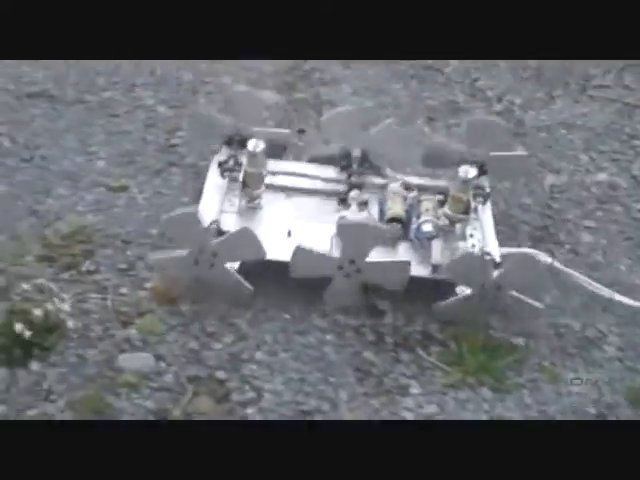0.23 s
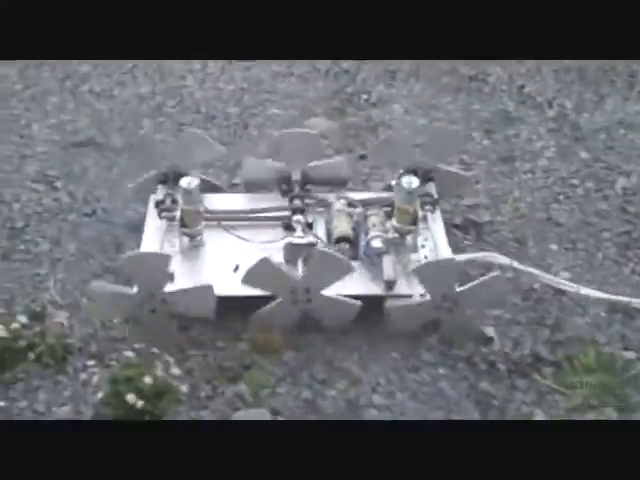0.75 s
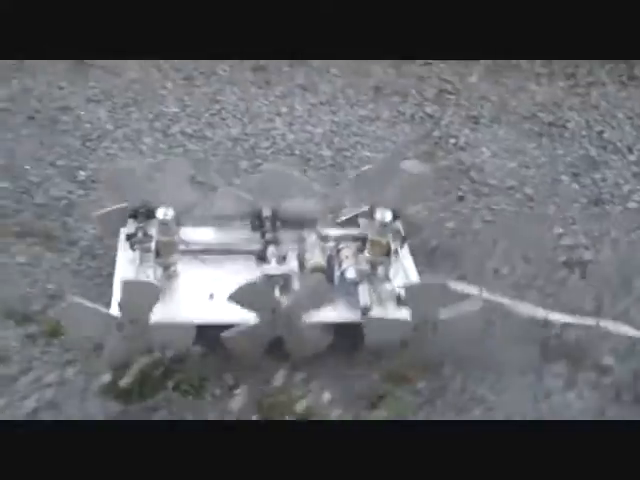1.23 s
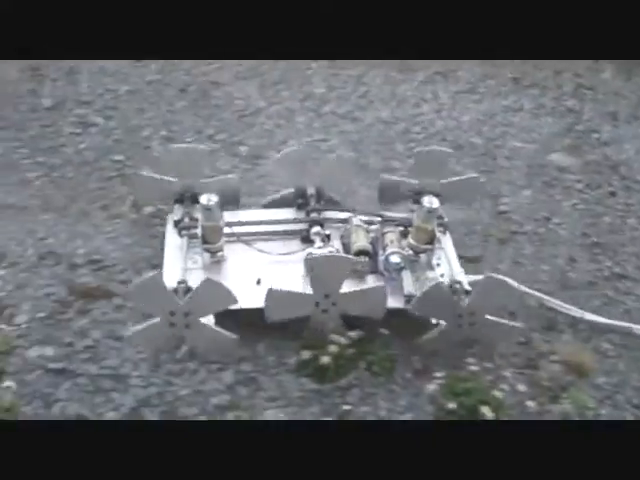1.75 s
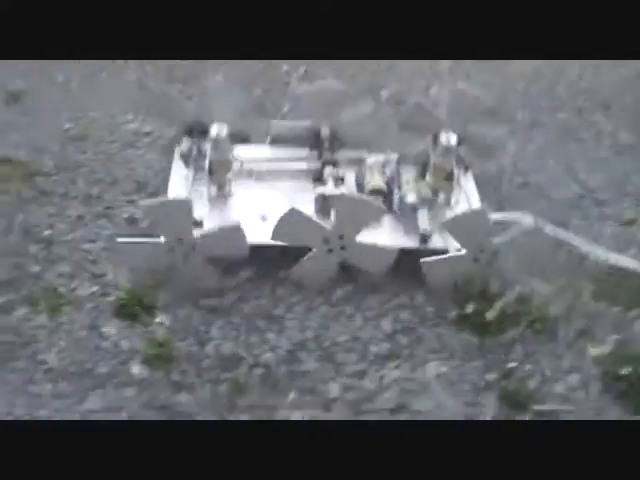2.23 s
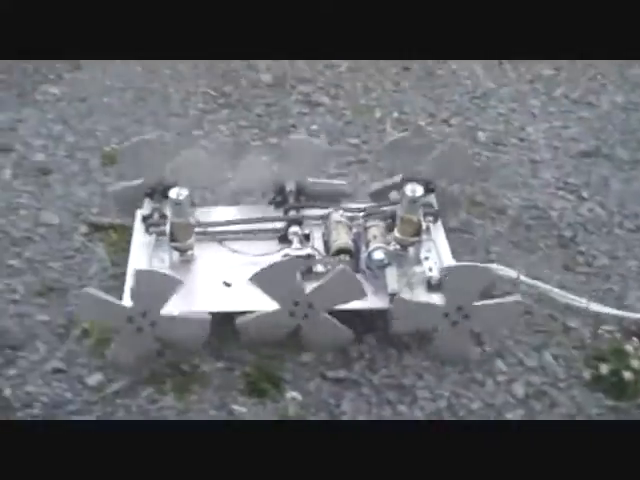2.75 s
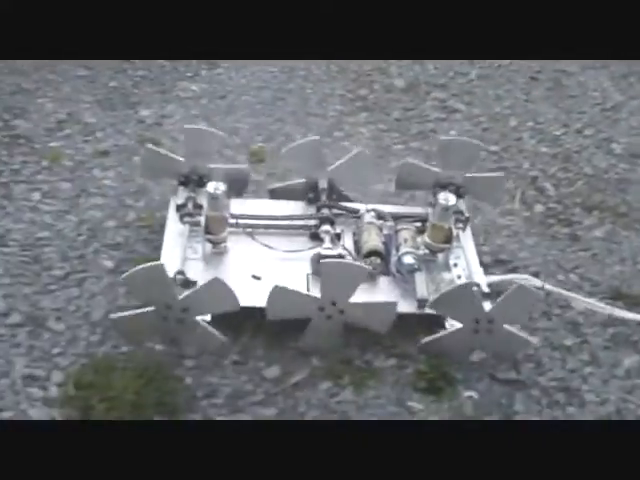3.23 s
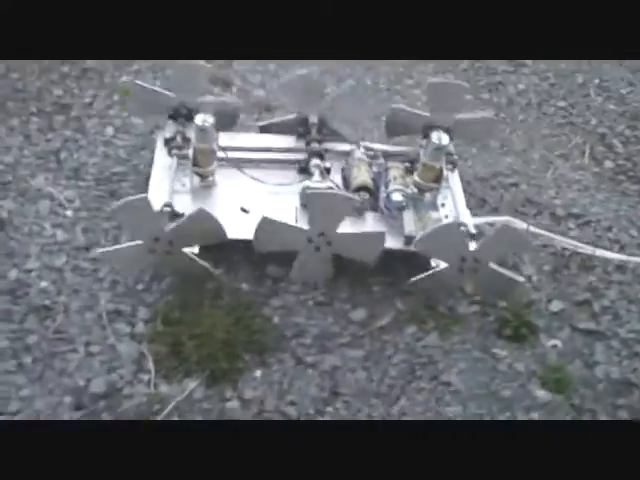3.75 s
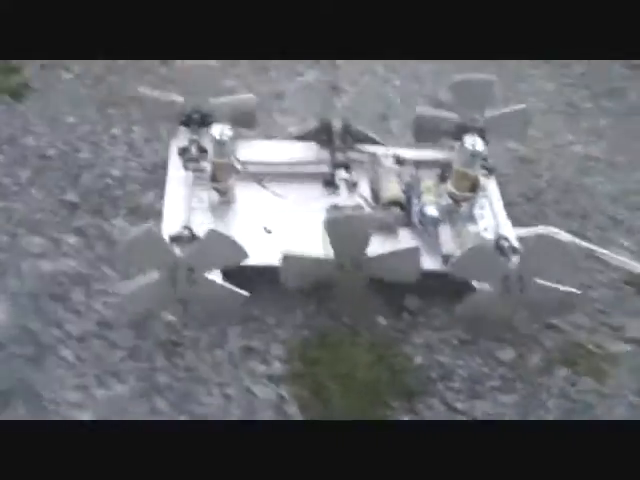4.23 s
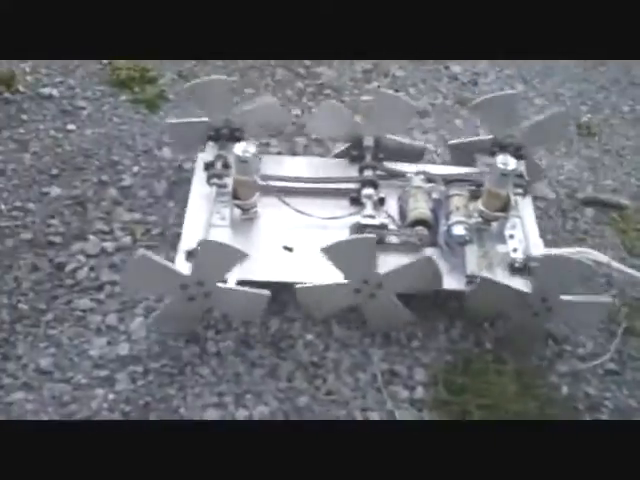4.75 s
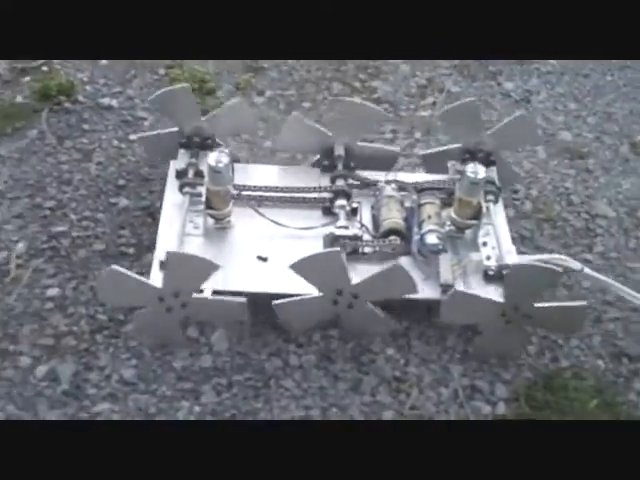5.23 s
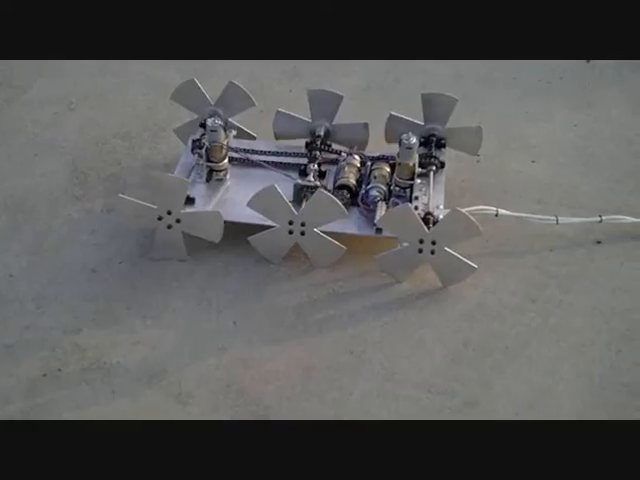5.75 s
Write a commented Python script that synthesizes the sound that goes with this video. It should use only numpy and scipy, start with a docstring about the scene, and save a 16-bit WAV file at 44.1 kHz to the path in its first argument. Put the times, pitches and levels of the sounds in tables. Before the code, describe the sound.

Fast, irregular metallic slapping and rattling on gritty stones, heard close and dry outdoors, with grinding crunches and barely audible motor hum, stopping suddenly.

```python
"""Paddle slaps on loose gravel lead: a small robot on metal paddle wheels clatters along, heard close by.
Each slap is a burst of shaped noise with a low knock, a high tick and a clean decaying rap.
Stones grind and click as the wheels plough in: noise and short damped tones, swelling at each dig.
Slaps and grinding excite the resonances of paddles and chassis; a faint wavering paddle ring follows the
crunch, and motor tones lie beneath. The sound stops abruptly."""
import sys
import numpy as np
from scipy.fft import rfft, irfft, next_fast_len
from scipy.io import wavfile
from scipy.ndimage import uniform_filter1d, map_coordinates

SR = 44100
rng = np.random.default_rng(int(sys.argv[2]) if len(sys.argv) > 2 else 0)


def unload_audio(sound):
    """Save the sound as a 16-bit wav file, at the path given as the first command line argument."""
    columns = np.transpose(np.atleast_2d(sound))
    # keep every value between -1 and 1, then stretch to whole-number steps
    steps = np.round(np.clip(columns, -1, 1) * 32767)
    wavfile.write(sys.argv[1], SR, steps.astype(np.int16))


N = 264746

# Motor tones: (mean frequency [Hz], frequency waver [Hz])
MOTOR_TONES = [(81, 1), (161, 1), (233, 3.5)]
# Mean motor tone levels under load: (time [s], low tone [dB], middle tone [dB], high tone [dB])
MOTOR_LOAD = [(0.05, -76, -63, -62), (0.46, -100, -88, -65.5), (1.28, -83, -67, -65),
              (3.62, -85, -71.5, -59), (4.17, -79, -85, -70), (4.45, -75, -64.5, -59.5),
              (4.89, -75, -75, -65.5), (5.07, -73, -73.5, -51.5), (5.55, -68, -69, -66.5)]
# Mean level of the paddles' faint wavering ring: (time [s], level over the crunch [dB])
PADDLE_HUM = [(0, -18), (.7, -12.5), (1.3, -15.5), (1.8, -24), (2.3, -21), (2.8, -21), (2.97, -3),
              (3.12, -19), (3.5, -9), (3.9, -14), (4.12, -12.5), (4.5, -12), (4.75, -22), (5.0, -10),
              (5.3, -14), (5.6, -16.5)]
# Bed of shifting gravel that never stops: (time [s], crunch level [dB])
GRAVEL_BED = [(0.0, -27.5), (0.32, -28), (0.53, -37.5), (0.92, -34), (1.56, -33), (1.99, -35.5),
              (2.21, -28.5), (3.4, -33), (3.79, -43), (4.64, -34), (5.02, -30.5), (5.45, -37.5)]
# Wheels dig in and plough through the stones: (time [s], crunch level at the start [dB], length [s],
# treble over crunch [dB], paddle ring over crunch [dB])
WHEEL_PLOUGHS = [(0, -41.5, 0.043, -11, 3.5), (0.136, -30.5, 0.31, -1.5, -13),
                 (0.49, -31, 0.15, -2.5, -13.5), (0.69, -20.5, 0.064, -7.5, 1.5),
                 (0.768, -29.5, 0.16, -5.5, 6.5), (0.932, -37.5, 0.087, -0.5, 11.5),
                 (1.106, -32, 0.25, 1, 4), (1.387, -31.5, 0.036, -17, -2.5), (1.494, -38, 0.18, -2, -4),
                 (1.631, -25, 0.043, -5, -4), (1.711, -26.5, 0.086, -8, -2), (2.001, -30, 0.11, 0.5, 3.5),
                 (2.1, -32, 0.1, -5, -7.5), (2.262, -44, 0.087, 13.5, 10), (2.385, -28, 0.14, -0.5, -4.5),
                 (2.563, -55, 0.75, 4.5, 8.5), (2.845, -31, 0.18, -0.5, 6), (3.07, -57.5, 0.074, 1.5, 10),
                 (3.216, -27.5, 0.13, 3, -0.5), (3.394, -39.5, 0.35, -1, 8.5), (3.715, -33, 0.22, -4.5, -1),
                 (4.015, -34, 0.19, -6, 8), (4.225, -38.5, 0.13, -11.5, -8.5), (4.39, -30, 0.18, -2.5, 4.5),
                 (4.597, -40, 0.048, 0, 1), (4.731, -39.5, 0.047, -16, 12), (4.838, -49.5, 0.41, 8.5, 11),
                 (5.087, -32, .13, -8.5, 10.5), (5.322, -44.5, 0.48, 3, 11.5), (5.503, -32, 0.051, -7.5, 1)]
# Broad colour of stone on stone and metal: (frequency [Hz], gain [dB])
STONE_COLOUR = [(30, -67.5), (150, -22), (300, -9.5), (500, -3.5), (1000, 1.5), (2000, 1.5), (4000, 1.5),
                (7000, 1.5), (10000, 0), (13000, -6), (15200, -59.5), (15400, -56), (15800, -62)]
# Modes of paddles and chassis, close groups as the wheels differ a little:
# (frequency [Hz], width [Hz], mean gain [dB])
METAL_MODES = [(491, 64, -6.5), (873, 33, -9.5), (1355, 17, -8), (1590, 34, -14.5), (2752, 20, 6.5),
               (2807, 28, 9), (2930, 10, -12), (2913, 38, -13), (3030, 47, -13.5), (3395, 42, 1.5),
               (4830, 50, -4.5), (5075, 18, -12.5), (4860, 11, -19.5), (5660, 24, -3), (6085, 74, -11),
               (7080, 29, -4.5), (6850, 35, -7), (8840, 240, -13), (9900, 58, -24.5), (10300, 65, -9),
               (11450, 150, -28), (12500, 240, -23.5)]
# Paddle slaps; each part's level is relative to the slap and is further offset by the constants below:
# (first touch [s], slap level [dB],
# fall [ms per 6 dB, held within 0.5 to 25; lower values mean the shortest slap],
# knock frequency [Hz], knock level [dB], tick frequency [Hz], tick level [dB],
# treble level [dB], paddle ring level [dB])
PADDLE_SLAPS = [(0.05, -5.5, 5.5, 1396, -6.5, 3500, -26.5, -12, -17),
                (0.073, -5, -0.5, 1285, -8, 3070, -15, -12, -18),
                (0.112, -25, -3, 1270, -3, 3360, -18, -19, -19.5),
                (0.155, -2.5, 6.5, 1290, -15.5, 3780, -17, -28.5, -17),
                (0.2, -3, 8.5, 1270, -8, 3100, -21, -31.5, -24),
                (0.213, -10, -2, 1210, -14, 5960, -6, -8, -18),
                (0.268, -8, 2, 1350, -5, 3280, -25, -19.5, -11.5),
                (0.314, 1, 1.5, 1340, -10, 3470, -35.5, -14, -24.5),
                (0.339, -5.5, 5.5, 1880, -4, 3050, -21, -17, -19.5),
                (0.36, -9, 10, 2490, -15, 3770, -19, -19.5, -20),
                (0.407, -9, 11, 1840, -15, 3480, -24, -12, -18),
                (0.482, -18.5, 5, 1040, 7, 3480, -18, -30, -25),
                (0.5, -7.5, 5.5, 1040, -16, 3360, -11, -25, -24),
                (0.518, -18, 18, 1420, -4.5, 3430, -26, -22, -15.5),
                (0.536, -2.5, 2, 2110, -16.5, 3530, -12, -15.5, -25),
                (0.583, -16.5, 7, 2280, -6, 3310, -16, -16, -19.5),
                (0.61, -16, 4.5, 2050, -14.5, 4050, -12.5, -19, -19),
                (0.677, -15, 9, 1460, -12.5, 3440, -20, -18, -9.5),
                (0.693, -3.5, 7.5, 944, -7.5, 3340, -19, -18.5, -24),
                (0.713, -6.5, 6.5, 1430, -15.5, 3780, -12, -12, -16.5),
                (0.731, -1.5, 8, 1760, -9.5, 6000, -27, -17, -21),
                (0.789, -16.5, 6.5, 1617, -10, 3390, -20, -20, -20),
                (0.842, -3, 7.5, 1310, -10, 4900, -26.5, -14.5, -17.5),
                (0.85, -1, 11.5, 2030, -10.5, 3180, -25, -15, -20.5),
                (0.888, -13.5, 4.5, 1610, -10, 3380, -18, -15.5, -16.5),
                (0.939, -16.5, 6.5, 1062, 3.5, 3460, -22, -14, -22.5),
                (0.954, -11, 10.5, 828, 0, 3050, -15, -11.5, -14),
                (0.989, -7, 5.5, 2410, -15.5, 7030, -15, -5.5, -17.5),
                (1.087, -16, 8.5, 1615, -4.5, 6100, -22.5, -18, -12.5),
                (1.106, -6, 10.5, 1246, -10, 4400, -23, -20.5, -12),
                (1.129, -2, 7, 1400, -8, 3400, -36.5, -17.5, -17.5),
                (1.185, -10, 7, 2130, -3, 3320, -12, -10, -19),
                (1.202, -12, 16.5, 1580, -13, 3350, -13, -22, -18),
                (1.233, -10, 20, 2470, -6, 4900, -16.5, -18, -27.5),
                (1.242, -13.5, 8, 1970, -7.5, 3190, -20, -13.5, -19.5),
                (1.273, -3, 2, 870, -36, 3120, -19, -16, -21.5),
                (1.319, -15.5, -1.5, 1600, -6.5, 3420, -18, -20, -20.5),
                (1.385, -13.5, 9, 1210, -5, 7170, -9, -5.5, -19),
                (1.444, -13.5, 15, 990, -10, 3430, -23, -16, -26),
                (1.476, -15, 3, 950, 2.5, 3140, -19.5, -19, -22.5),
                (1.508, -12.5, 10.5, 1300, -4.5, 3170, -20.5, -16, -20.5),
                (1.522, -10.5, -1, 1420, -8, 4810, -18, -14, -17.5),
                (1.555, -19.5, 11.5, 824, -6, 5000, -11, -16, -17.5),
                (1.609, -10.5, 1, 1700, -0.5, 3350, -20.5, -17, -19),
                (1.634, -15.5, -0.5, 1000, -2.5, 3350, -19.5, -15, -10),
                (1.66, -4.5, 10.5, 991, -4.5, 4790, -35, -27.5, -9.5),
                (1.72, -2, 12, 1214, -10, 3500, -27, -28, -15),
                (1.752, -8.5, 7.5, 1840, -5.5, 3380, -17, -9.5, -25.5),
                (1.804, -8, 7, 755, -1.5, 3680, -23, -35, -28),
                (1.896, -7, 7.5, 1635, -27, 3430, -31, -15.5, -20.5),
                (1.995, -11, 8.5, 1094, 2, 5030, -19.5, -26, -19.5),
                (2.004, -4, 6, 930, -7.5, 3026, -20, -35, -24),
                (2.013, -8.5, 8.5, 1230, -14, 3400, -16.5, -37, -27),
                (2.05, -11, 7.5, 1510, -5.5, 3380, -20.5, -11, -21.5),
                (2.117, 1, 3.5, 904, -9, 3500, -22, -24.5, -19.5),
                (2.142, -10, 13, 2030, -5, 3840, -13, -25, -26),
                (2.168, -6.5, 7.5, 1490, -11.5, 4490, -18, -13, -26),
                (2.198, -10, 7.5, 1220, -16.5, 7010, -18, -7.5, -7.5),
                (2.265, -11, 11, 1290, -15, 3330, -12, -15, -12),
                (2.399, -20, -5, 1440, -6.5, 3400, -17, -15, -9.5),
                (2.437, -2, 8.5, 990, -12, 3390, -18.5, -26, -10),
                (2.48, -5, 11, 2470, -5, 3800, -11, -16.5, -26),
                (2.521, -9.5, 2.5, 1203, 3.5, 3140, -18.5, -29, -23),
                (2.568, -13.5, 6.5, 786, -13.5, 3430, -12, -6.5, -17.5),
                (2.65, -10, -4, 1865, -4, 3420, -16, -28, -18),
                (2.69, -16.5, 18.5, 1560, -14, 3740, -18, -6, -13.5),
                (2.744, -11.5, 5, 970, -8, 3410, -18, -18, -16),
                (2.793, -12.5, 9, 1530, -4, 3360, -19, -17.5, -23.5),
                (2.814, -18.5, 2.5, 1640, -1, 3370, -18, -26, -14),
                (2.844, -4, 4.5, 2270, -15.5, 3540, -20.5, -31, -12),
                (2.883, -5.5, 8, 1946, -9.5, 4370, -15.5, -13, -22),
                (2.899, -4.5, 11.5, 1110, -7.5, 3420, -29, -18, -21.5),
                (2.935, -14, 5, 1630, -11, 3380, -25, -15, -6),
                (2.954, -11.5, 6, 1600, -17, 3410, -13, -20, -14.5),
                (2.972, -16, 11, 1610, -5.5, 3420, -13.5, -25, -19),
                (3.061, -8, 8, 1580, -14, 6120, -19, -8, -18.5),
                (3.127, -20.5, 11.5, 2430, -12, 3300, -14, -4, -17.5),
                (3.199, -17, -1.5, 1100, -5, 4980, -20.5, -10.5, -17),
                (3.225, -0.5, 7, 1530, -6, 5130, -18.5, -24, -19.5),
                (3.25, -5, 20.5, 2420, -13.5, 3050, -21, -27, -12),
                (3.326, -9.5, 4, 1340, -2.5, 3810, -18, -18.5, -8.5),
                (3.377, -17, 9, 774, -2, 3130, -19, -20, -17),
                (3.433, -21, -2.5, 1200, -7, 3310, -18, -19, -11.5),
                (3.533, -11.5, 13, 961, -11, 3140, -16, -17, -13.5),
                (3.613, -14, 4.5, 1500, -8, 3290, -22, -16, -18),
                (3.634, -16, 10.5, 1600, -25, 3370, -20, -16, -17.5),
                (3.732, -18.5, 5.5, 984, -39, 7060, -1, 1, -19),
                (3.844, -3.5, 12, 970, -14, 3880, -15, -37, -18),
                (3.871, -11, 9.5, 1740, -28, 3710, -16, -9.5, -25),
                (3.887, -7, 8, 2085, -4, 4900, -25, -18, -20),
                (4.006, -21, 13.5, 1490, 0, 3120, -20, -24, -13.5),
                (4.029, -25.5, -8, 1440, -8.5, 5620, -18, -16, -11),
                (4.061, -23.5, 18, 1605, -15, 3400, -24, -5, -20.5),
                (4.128, -9, 13.5, 1520, -16, 3360, -18, -13, -24),
                (4.147, -14.5, 9, 2120, -7, 3470, -26, -31, -18),
                (4.195, -14.5, -1, 1222, 5, 3290, -21, -29, -31),
                (4.265, -15.5, 12.5, 1020, 4.5, 3100, -31, -18, -15),
                (4.29, -16.5, 9.5, 1600, -24, 3110, -9, -12, -12.5),
                (4.389, -0.5, 2, 2210, -13.5, 3830, -13, -33.5, -17),
                (4.423, -6, 12.5, 1740, -7, 3240, -22.5, -11.5, -22.5),
                (4.477, -1.5, 9, 2430, -13, 3920, -26.5, -17.5, -24.5),
                (4.537, -12.5, 3.5, 1170, -7.5, 7120, -25.5, -5.5, -16.5),
                (4.634, -10.5, 2.5, 1560, -19, 3420, -11, -18, -21),
                (4.648, -15.5, 5.5, 1170, -3, 3260, -19.5, -16, -17.5),
                (4.676, -20, 5, 1110, 0, 3370, -20, -21, -20),
                (4.723, -12, 3.5, 842, -19, 5620, -12, -26, -20),
                (4.745, -10.5, 9.5, 885, -16.5, 5060, -17, -14, -11),
                (4.771, -6.5, 2.5, 940, -6.5, 3700, -24, -8.5, -10),
                (4.825, -19.5, 7, 751, -14, 3160, -12, -19.5, -13),
                (4.839, -21, 2, 2330, -15, 3170, -18, -11, -19.5),
                (4.865, -20, 1.5, 1560, -12, 4820, -18, -16, -14.5),
                (4.904, -21.5, 4.5, 886, 4.5, 3290, -18, -21, -15.5),
                (4.939, -11, 9, 1577, -9.5, 4810, -12, -16, -16),
                (4.988, -14, 3, 1140, -7, 5040, -10, -15, -22),
                (5.01, -16, 11, 1570, -8.5, 4880, -13.5, -6, -20.5),
                (5.037, -13, 8.5, 942, -2, 4940, -18, -5.5, -14.5),
                (5.052, -5.5, 1, 1390, -6.5, 5770, -9.5, -6.5, -28.5),
                (5.102, 0, 3.5, 894, -6, 3820, -17, -30.5, -11),
                (5.142, -15.5, 6, 1760, -4.5, 3830, -16, -16, -26),
                (5.159, -6, 8, 1635, -11, 3810, -21, -19, -19),
                (5.192, -10, 10, 1420, -5, 3150, -19, -9, -18),
                (5.212, -13.5, 5, 2170, -7.5, 6040, -15, -16.5, -17.5),
                (5.282, -18.5, 6, 778, 0, 3140, -15, -11, -14.5),
                (5.316, -16, 12, 1610, -19, 5660, -10.5, -8, -11),
                (5.385, -11, 6.5, 2020, -15, 3140, -18, -20, -17.5),
                (5.422, -16, 10.5, 1030, -11, 4850, -12, -22, -15.5),
                (5.458, -9, 9.5, 1550, -13, 4860, -21, -29.5, -11.5),
                (5.502, -14.5, 8, 2430, -8.5, 4920, -13.5, -17.5, -13),
                (5.524, 0, 1.5, 861, -23, 3320, -13.5, -9, -22),
                (5.548, -7, 8, 1130, -14, 3300, -23, -15, -21.5)]
# Overall level, with the cut at the end: (time [s], level [dB])
END_CUT = [(0, 0), (5.612, 0), (5.615, -20), (5.65, -60), (6.1, -90)]
# Narrow gap in the treble response: (frequency [Hz], width [Hz], gain at the centre [dB])
TREBLE_GAP = (7820, 420, -12.5)

PADDLE_HUM_HZ = 1592  # mean frequency
DIG_S, LIFT_S, EASE_DB = 0.004, 0.01, 11.5  # digging in, lifting out, loss over the length
BED_TREBLE_DB, BED_RING_DB = -12.5, -0.5  # over the bed's crunch
RUB_DB = 5  # how hard grinding shakes the metal
RISE_MS, RISE_PER_FALL = 2.27, 0.15  # touch to peak; long slaps swell more slowly
SCRAPE_DB, TREBLE_DB, KNOCK_DB, TICK_DB, RAP_DB = -16, -12, -14.5, -5.5, -5.5  # offsets of a slap's parts
RAP_CYCLES = 0.9  # cycles in which the rap decays by 1/e
CRISP_MS, CRISP_DB = 1.5, 11  # the rap is stronger in short slaps: decay over fall time, limit of the boost
JOLT_DB = 8  # from a slap's ring level to the force behind it
TOP_HZ = 15790  # upper band limit


def amp(db):
    """The decibel law: amplitude gain of a level in dB."""
    return 10 ** (np.asarray(db) / 20)


def unit(x):
    """Normalisation of power: scaled to rms 1."""
    return x / np.sqrt(np.mean(x ** 2) + 1e-20)


def curves(rows):
    """Linear interpolation: one value per sample for each column after the time."""
    s, *columns = np.transpose(rows)
    return [np.interp(np.arange(N) / SR, s, column) for column in columns]


def wobble(rate):
    """Slow random modulation: a smooth curve through random knots, rate of them a second."""
    knots = rng.standard_normal(int(N * rate / SR) + 4)
    return map_coordinates(knots, [np.arange(N) * rate / SR])


def filtered(x, response):
    """Linear filtering: the spectrum of x times a complex response of frequency."""
    m = next_fast_len(x.shape[-1] * 9 // 8)  # zero padding gives the tails room
    spectrum = rfft(x, m) * response(np.fft.rfftfreq(m, 1 / SR))
    return irfft(spectrum, m)[..., :x.shape[-1]]


def resonance(f, hz, width):
    """Damped harmonic oscillator: a causal response of peak gain 1."""
    return 1j * f * width / (hz * hz - f * f + 1j * f * width)


def dull(f):
    """Spectral division: share of a contact below the treble; sharp edges add more above."""
    return 1 / (1 + (f / 5000) ** 4)


def stony(f):
    """Spectral envelope: the broad colour of stone on stone and metal."""
    hz, db = np.transpose(STONE_COLOUR)
    return amp(np.interp(np.log(f + 1), np.log(hz), db))


def tone(hz):
    """Frequency modulation: a sine of rms 1 whose phase accumulates its frequency."""
    return np.sqrt(2) * np.sin(2 * np.pi * np.cumsum(hz) / SR)


def motors():
    """Modulated tones: three low tones follow the motor load in level and waver randomly in pitch."""
    hum = 0
    for (hz, waver), db in zip(MOTOR_TONES, curves(MOTOR_LOAD)):
        level = amp(db + 3.5 * wobble(18))
        hum = hum + level * tone(hz + waver * wobble(11))
    return hum


def paddle_hum():
    """Modulated tone: a faint wavering metal ring of the paddles follows the crunch in level."""
    crunch_level = ploughing()[0]
    paddle_hum_level = crunch_level * amp(curves(PADDLE_HUM)[0] + 3.5 * wobble(25))
    return paddle_hum_level * tone(PADDLE_HUM_HZ + 24 * wobble(45))


def ploughing():
    """Forced displacement: levels of crunch, treble and ring from the bed plus each dig, ease and lift."""
    t = np.arange(N) / SR
    crunch = amp(curves(GRAVEL_BED)[0])
    treble = crunch * amp(BED_TREBLE_DB)
    ring = crunch * amp(BED_RING_DB)
    for s, db, length, treble_db, ring_db in WHEEL_PLOUGHS:
        easing = amp(db - EASE_DB * np.clip((t - s) / length, 0, 1))
        push = easing * np.interp(t, np.cumsum([s, DIG_S, length, LIFT_S]), [0, 1, 1, 0])
        crunch = crunch + push
        treble = treble + push * amp(treble_db)
        ring = ring + push * amp(ring_db)
    return crunch, treble, ring


def grit(count, spread_db, cycles):
    """Random impacts: stone clicks as short damped tones of scattered time, pitch, size and life."""
    when, pitch, size, life = rng.random((count, 4)).T
    hz = 450 * 28 ** pitch
    t = np.arange(400) / SR
    turns = hz[:, None] * t
    decay = np.exp(-turns / (cycles * (0.36 + life[:, None] ** 2)))
    attack = 1 - np.exp(-turns / 0.1)
    strength = amp(spread_db * size ** 2) * np.sqrt(hz / 1000)
    clicks = np.sin(2 * np.pi * turns) * decay * attack
    clicks *= strength[:, None] * np.linspace(1, 0, t.size)  # ends each click at zero
    at = (when * N).astype(int)[:, None] + np.arange(t.size)
    return unit(np.bincount(at.ravel(), clicks.ravel(), N + t.size)[:N])


def grinding():
    """Granular friction in clumps: hiss, ringing chips, dry clicks; returns crunch and force on the metal."""
    level, treble, ring = ploughing()
    clumps = amp(1.6 * wobble(45) + 1.5 * wobble(160))
    chips = 0.65 * grit(count=5000, spread_db=1.5, cycles=18.0)
    clicks = 0.75 * grit(count=5000, spread_db=12, cycles=0.9)
    rub = clumps * (0.82 * rng.standard_normal(N) + chips + clicks)
    crunch = unit(filtered(rub, stony))
    low = filtered(crunch, dull)
    heard = level * low + treble * (crunch - low)
    return heard, amp(RUB_DB) * ring * unit(rub)


def paddles(force):
    """Modal resonance: each mode takes the force unevenly, as the point of contact keeps moving."""
    ring = np.zeros(N)
    for hz, width, db in METAL_MODES:
        uneven_force = force * amp(db + 3 * wobble(22))
        ring += filtered(uneven_force, lambda f: resonance(f, hz, width))
    return ring


def slaps():
    """Impact excitation: ragged contacts give scrape, knock, tick and rap; returns these and metal jolts."""
    contact, shake = np.zeros((2, N + SR))
    ms = np.arange(SR // 8) * 1000 / SR
    for s, db, fall, knock_hz, knock_db, tick_hz, tick_db, treble_db, ring_db in PADDLE_SLAPS:
        noise, raggedness = rng.standard_normal((2, ms.size))
        noise = noise * np.exp(0.17 * unit(uniform_filter1d(raggedness, size=30)))

        fall = np.clip(fall, 0.5, 25)
        rise = RISE_MS + RISE_PER_FALL * fall
        late = ms - rise  # time after the peak
        swell = amp(db - 6 * np.maximum(late, 0) / fall) * np.clip(ms / rise, 0, 1) ** 0.5
        swell *= 1 + 0.14 * np.exp(-np.abs(late) / 0.2)  # the hardest contact is a short crack

        def part(response):
            """Filtered excitation: one band of the burst at rms 1."""
            return unit(filtered(noise, response))

        scrape = amp(SCRAPE_DB) * part(lambda f: stony(f) * dull(f))
        scrape += amp(treble_db + TREBLE_DB) * part(lambda f: stony(f) * (1 - dull(f)))
        knock = amp(knock_db + KNOCK_DB) * part(lambda f: resonance(f, knock_hz, 0.45 * knock_hz) ** 2)
        tick = amp(tick_db + TICK_DB) * part(lambda f: resonance(f, tick_hz, 0.091 * tick_hz) ** 2)

        # the stone's clean rap starts at the peak
        turns = np.maximum(late, 0) * knock_hz / 1000
        rap_level = amp(db + knock_db + RAP_DB + CRISP_DB * np.exp(-fall / CRISP_MS))
        rap = rap_level * np.sin(2 * np.pi * turns) * np.exp(-turns / RAP_CYCLES)

        start = round(s * SR)
        at = slice(start, start + ms.size)
        contact[at] += swell * (scrape + knock + tick) + rap
        shake[at] += swell * amp(ring_db + JOLT_DB) * unit(noise)
    # small stones push little air at low pitch
    contact = filtered(contact, lambda f: f ** 4 / (f ** 4 + 280 ** 4))
    return contact[:N], shake[:N]


def scene():
    """Superposition: contacts heard directly and through the ringing metal, over the motors."""
    crunch, rubbing = grinding()
    contact, jolts = slaps()
    ringing = paddles(rubbing + jolts) + paddle_hum()
    return (crunch + contact + ringing + motors())[None]


def record(dry):
    """Saturation and band limiting: the microphone rounds hard peaks; end cut, treble gap and limit follow."""
    hz, width, db = TREBLE_GAP
    rounded = dry / (1 + np.abs(dry / 0.62) ** 4) ** (1 / 4)
    ended = rounded * amp(curves(END_CUT)[0])

    def response(f):
        """Band limitation: a bell-shaped gap in dB and a sharp upper limit."""
        return amp(db * np.exp(-((f - hz) / width * 2.4) ** 2)) * (f < TOP_HZ)

    return filtered(ended, response)


dry = scene()
out = record(dry)
unload_audio(out)
```